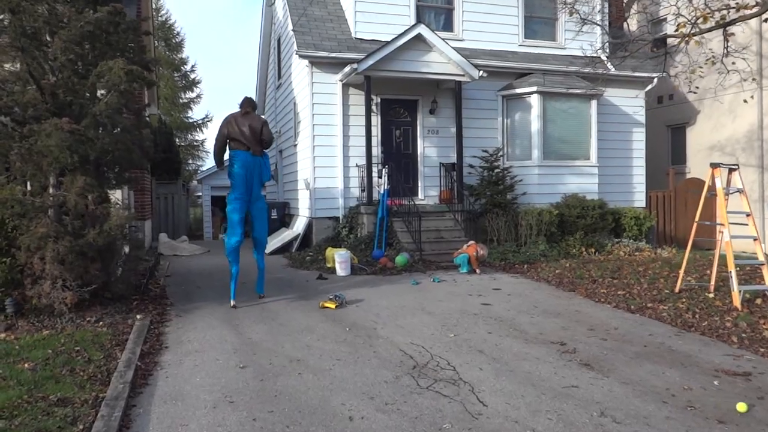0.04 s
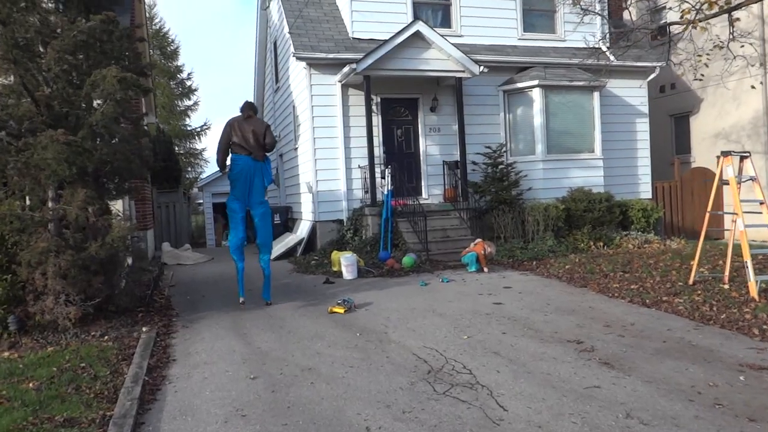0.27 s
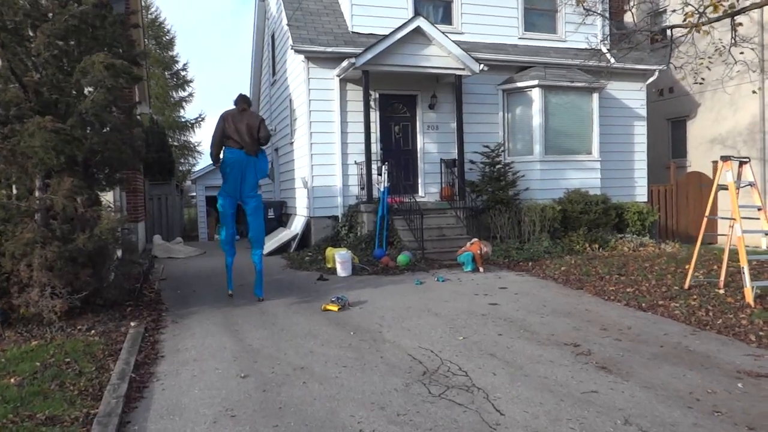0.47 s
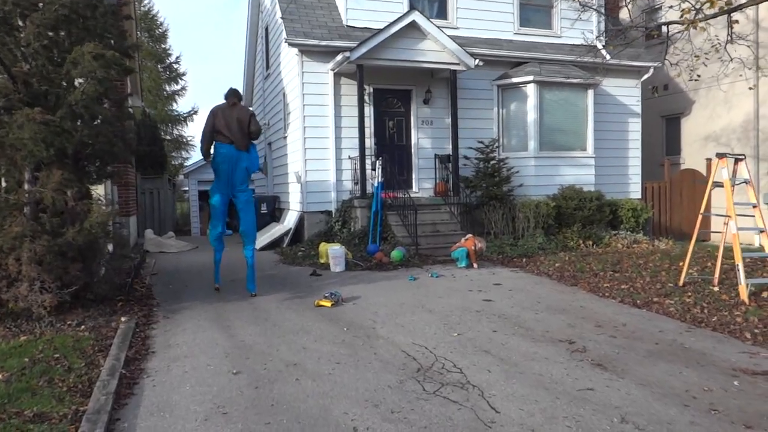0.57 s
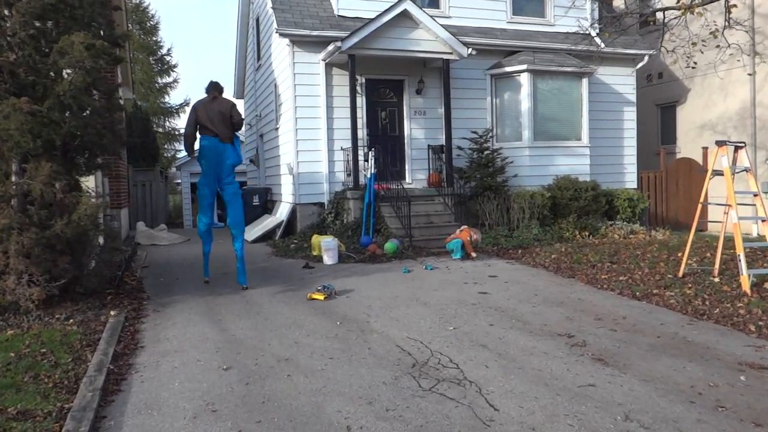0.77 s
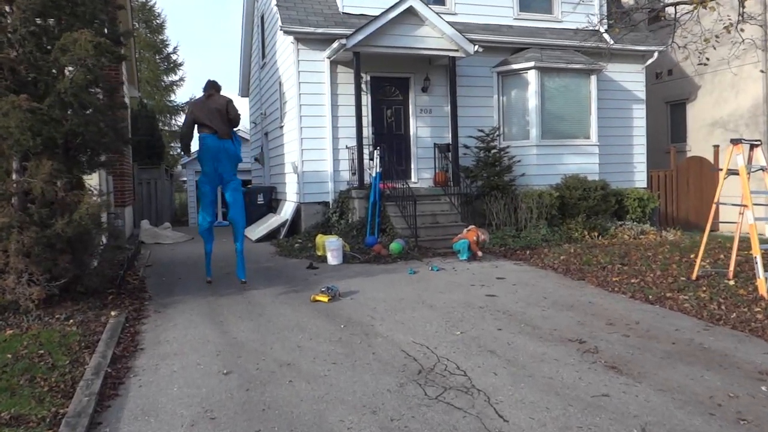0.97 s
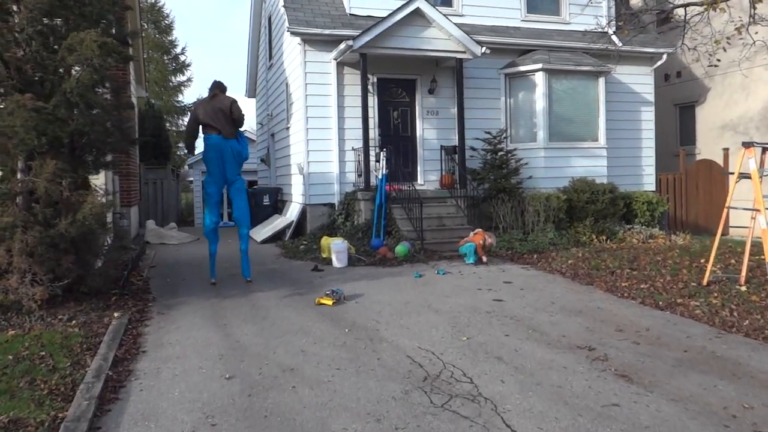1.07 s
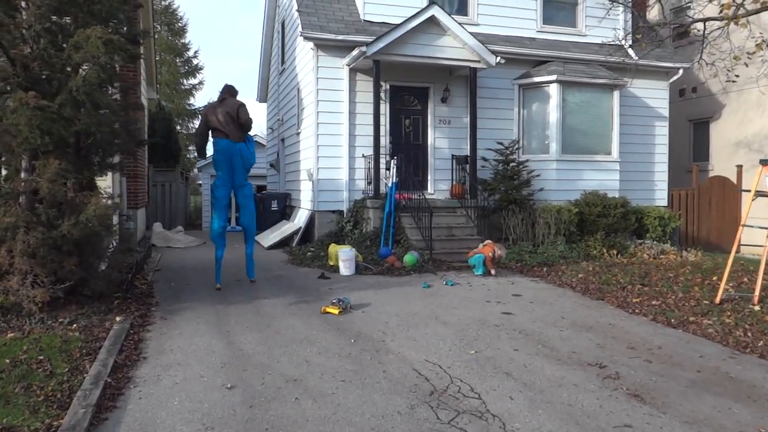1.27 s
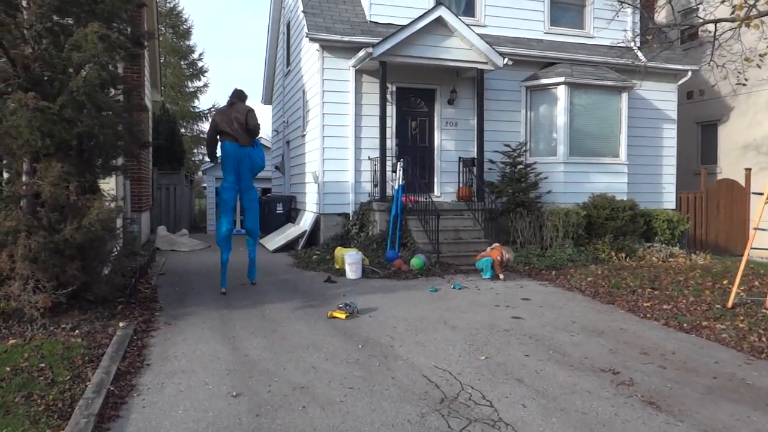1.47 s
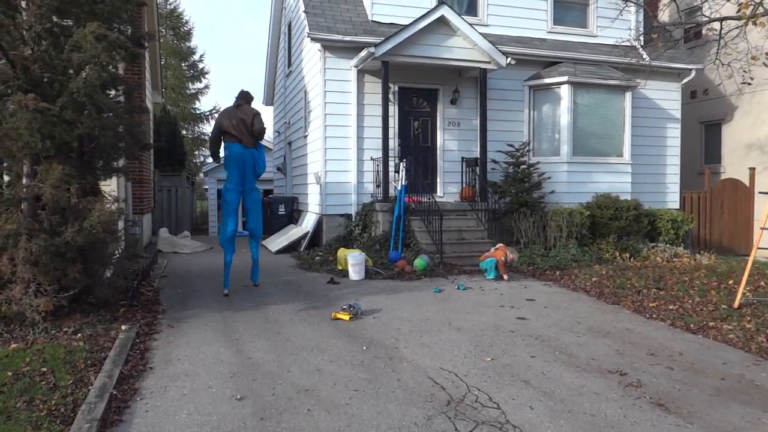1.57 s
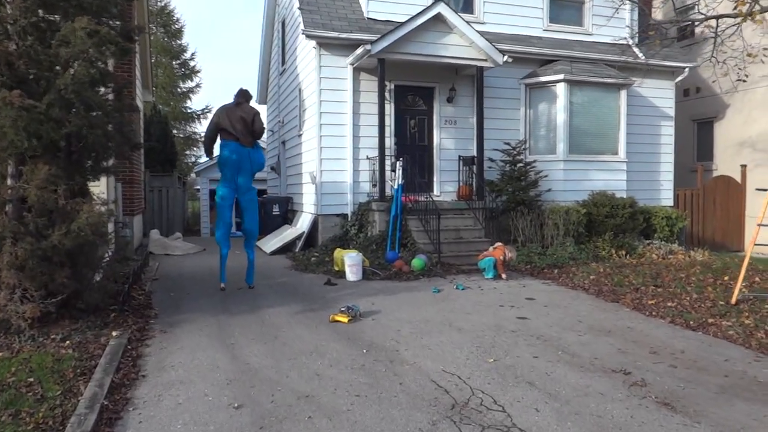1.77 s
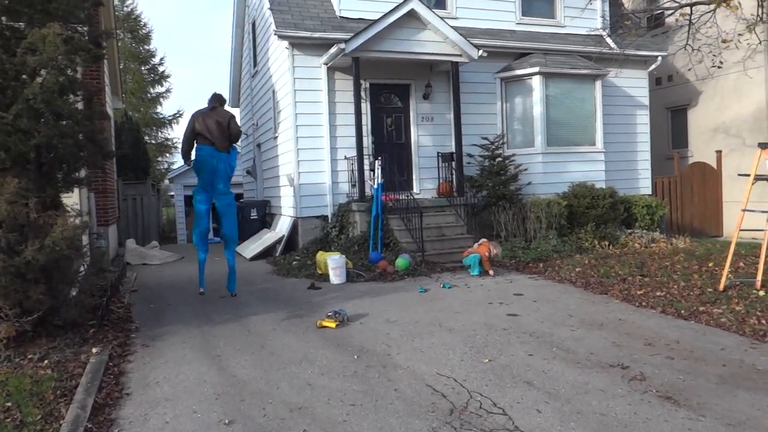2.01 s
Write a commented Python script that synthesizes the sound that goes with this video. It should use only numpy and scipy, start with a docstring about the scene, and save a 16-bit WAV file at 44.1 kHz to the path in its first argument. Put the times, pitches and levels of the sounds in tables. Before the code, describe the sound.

Stilts clop and scuff unevenly on a gritty asphalt driveway some metres away. Close to the microphone, the handheld camera snaps sharply at the start, then ticks and bumps softly over a faint wash of distant traffic.

```python
"""Stilts on an asphalt driveway

Someone walks on stilts some metres from a handheld camera, the tips clopping and scuffing over grit
to the right. Close to the microphone the camera body snaps, ticks and pings in the hand, and wind
and handling give low thumps. Distant traffic and air wash under it all."""
import sys
import numpy as np
from scipy import signal
from scipy.fft import rfft, irfft
from scipy.io import wavfile
from scipy.ndimage import uniform_filter1d

SR = 44100
rng = np.random.default_rng(int(sys.argv[2]) if len(sys.argv) > 2 else 0)


def generate_wav(sig):
    """Save sig (samples, or channels by samples) to the path in sys.argv[1] as 16-bit PCM at SR."""
    pcm = np.round(np.clip(np.atleast_2d(sig).T, -1, 1) * 32767).astype(np.int16)
    wavfile.write(sys.argv[1], SR, pcm)


N = 90184
BODY_PAN_DB, HISS_T60_S = 3.5, 0.013  # camera body noises; every pan is dB of left over right


def amp(db):
    return 10 ** (np.asarray(db, float) / 20)


def unit_rms(x):
    return x / np.sqrt(np.mean(x ** 2) + 1e-20)


def over_frequency(points, hz):
    f, value = np.transpose(points)
    return np.interp(np.log(hz + 1), np.log(f + 1), value)


def over_time(points):
    return np.interp(np.arange(N) / SR, *np.transpose(points))


def band(f, hz, octaves):
    return np.exp(-(np.log2((f + 1) / hz) / octaves) ** 2)


def place(mix, start_s, sound, pan_db):
    """Adds a sound at a time and between left and right."""
    at = round(start_s * SR)
    first = max(at, 0)
    sound = sound[max(-at, 0):][:N - first]
    mix[:, first:first + len(sound)] += amp([[pan_db / 2], [-pan_db / 2]]) * sound


def ring(modes, rise_s):
    """Dying sines with a soft start, peak 1."""
    t = np.arange(2600) / SR
    x = sum(amp(db - 60 * t / t60) * np.sin(2 * np.pi * min(hz, 15000) * t) for hz, db, t60 in modes)
    x *= 1 - np.exp(-t / rise_s)
    return x / abs(x).max()


def traffic_and_air():
    """A far wash of noise with drifting patches and a flickering treble."""
    # Colour of the wash. Each row: frequency in Hz, relative level in dB.
    spectrum = [(12, -48), (20, -6.5), (81, -4), (378, -3), (431, -4), (955, -1), (1500, -5.5),
                (1620, -9.5), (2000, -9), (3060, -14.5), (10100, -19), (11200, -27.5), (14600, -72),
                (22000, -120)]
    # Its slow fall. Each row: time in seconds, relative level in dB.
    levels = [(0.0, -44), (0.67, -45.5), (2.04, -46.5)]
    # Its stereo width. Each row: frequency in Hz, left-right correlation.
    likeness = [(60, 0.8), (170, 0.99), (500, 0.61), (1430, 0.65), (4110, 0.63), (11800, 0.56)]
    frames, hz = N // 128 + 5, np.fft.rfftfreq(512, 1 / SR)
    a, b, c, d, patches = rng.standard_normal((frames, 257, 5)).T
    patches_db = unit_rms(uniform_filter1d(uniform_filter1d(patches, size=8, axis=0), size=16, axis=1))
    flicker = unit_rms(uniform_filter1d(rng.standard_normal(frames), size=4))
    flicker_db = 1.57 * flicker * np.clip(hz / 5000, 0, 1)[:, None]
    same = over_frequency(likeness, hz)[:, None]
    left = a + 1j * b
    right = same * left + np.sqrt(1 - same ** 2) * (c + 1j * d)
    spectra = np.array([left * amp(-0.15), right * amp(0.15)]) * amp(patches_db + flicker_db)
    noise = signal.istft(spectra, nperseg=512, noverlap=384)[1][:, :N]
    wash = irfft(rfft(noise) * amp(over_frequency(spectrum, np.fft.rfftfreq(N, 1 / SR))), N)
    return unit_rms(wash) * amp(over_time(levels) + 1)


def wind_rumble(cutoff_hz=73, likeness=0.95):
    """Wind on the microphone: lumpy low noise, nearly alike at both ports."""
    # Gust strength. Each row: time in seconds, relative level in dB.
    gusts = [(0.0, -67), (0.04, -85), (1.95, -67.5), (2.04, -56.5)]
    hz = np.fft.rfftfreq(N, 1 / SR)
    left, other = rng.standard_normal((2, N))
    right = likeness * left + np.sqrt(1 - likeness ** 2) * other
    rumble = irfft(rfft([left, right]) * hz / (hz + 30) / (1 + (hz / cutoff_hz) ** 4), N)
    return unit_rms(rumble) * amp(over_time(gusts) + 8)


def stilt_scuffs(grains_per_s=9000, top_hz=11150):
    """A tip drags over grit: dense grains that swell and fade."""
    # Drags. Each row: start, rise and time to fade 30 dB in seconds, rms level at the crest in dB,
    # centre in Hz, half-width in octaves, pan in dB.
    drags = [(-.03, 0.037, 0.1, -32.5, 7300, 0.56, -8), (-.01, 0.019, 0.12, -36.5, 3020, 1.6, -4.5),
             (0.031, 0.0055, 0.19, -37.5, 6100, 2.9, -9), (0.061, 0.037, 0.085, -41.5, 1560, 1.2, -1),
             (0.152, 0.033, 0.14, -45.5, 5750, 2.1, -8.5), (.34, 0.059, 0.95, -47, 1580, 0.86, -1),
             (.47, 0.03, 0.076, -48, 6960, 0.86, -6.5), (0.688, 0.017, 0.14, -49.5, 6700, 0.9, -4),
             (0.749, 0.032, 0.041, -44.5, 6140, 4.4, -7.5), (.955, 0.0023, 0.17, -41.5, 5670, 3.6, -6.5),
             (1.057, 0.034, 0.1, -53.5, 5500, 2, -14), (1.226, 0.12, 0.17, -54.5, 9600, 0.7, -1.1),
             (1.297, 0.016, 0.014, -40, 2480, 3.5, -8), (1.311, 0.0088, 0.031, -31, 1460, 0.95, -3.5),
             (1.327, 0.0079, 0.051, -36, 1650, 1.48, -4), (1.35, 0.0067, 0.056, -36, 905, 2.9, -7),
             (1.341, 0.049, 0.13, -43.5, 4730, 1.5, -4), (1.978, 0.0016, 0.038, -39, 9150, 0.82, 1),
             (1.984, 0.0028, 0.017, -35.5, 9800, 0.28, -2), (2.01, 0.0024, 0.067, -44.5, 8000, 2.5, -2)]
    mix = np.zeros((2, N))
    t, f = np.arange(16384) / SR, np.fft.rfftfreq(16384, 1 / SR)
    for start, rise, fade, db, hz, octaves, pan_db in drags:
        hit, size, sign = rng.random((3, len(t)))
        grain_db = -2.2 * np.log(size + 0.0023)  # many faint grains, a few loud ones
        grains = (hit < grains_per_s / SR) * amp(grain_db) * np.sign(sign - 0.5)
        grit = unit_rms(irfft(rfft(grains) * band(f, hz, octaves) * np.exp(-(f / top_hz) ** 40)))
        envelope = np.minimum(t / rise, 1) ** 2 * amp(db - 30 * np.maximum(t - rise, 0) / fade)
        place(mix, start, grit * envelope, pan_db)
    return mix


def microphone_thumps(dc_removal=0.87):
    """Wind and handling give short low thumps, reaching one port a little before the other."""
    # Thumps. Each row: centre in seconds, gain in dB, pitch in Hz, half-length in cycles, pan in dB.
    thumps = [(.0208, -30, 293, 0.91, -1.5), (0.054, -38, 294, 0.88, -1), (0.357, -33.5, 81, 0.26, 0),
              (0.5047, -29.5, 317, 0.96, -.5), (0.3418, -41.5, 370, 2.2, 1),
              (0.7485, -33.5, 215, 0.72, 1.5), (0.797, -32.5, 91, 0.27, -2.4), (.936, -24, 358, 0.77, -2),
              (0.9558, -33.5, 136, 0.61, -1), (1.001, -35, 267, 0.56, 10), (1.0069, -28, 196, 0.59, -5),
              (1.065, -37.5, 89, 0.42, 0), (1.09, -33.5, 137, 0.5, 0), (1.103, -30.5, 74, 0.35, 0.5),
              (1.3238, -32, 395, 1.8, -1), (1.333, -32.5, 430, 0.8, -3), (1.3595, -29, 427, 0.62, -1),
              (1.3729, -33, 325, 0.34, 3), (1.384, -43.5, 64.6, 0.65, -2), (1.421, -42.5, 68.6, 0.98, -2),
              (1.435, -41.5, 134, 0.92, 1), (1.5848, -29.5, 166, 0.66, 0),
              (1.5932, -31.5, 145, 0.26, -15.5), (1.6076, -31, 167, 0.51, 8),
              (1.6692, -25.5, 226, 0.4, 5.5), (1.689, -22.5, 141, 0.35, 5.5), (1.8995, -32, 192, 0.43, 5),
              (1.926, -38, 82.5, .6, .5), (1.941, -39, 230, 1, -7), (1.951, -36, 202, 0.51, 9)]
    mix, t = np.zeros((2, N)), np.arange(-900, 900) / SR
    for centre, db, hz, cycles, pan_db in thumps:
        skew_cycles = 0.084 * rng.uniform(-1.76, 1)
        at = round(centre * SR) - 900
        for port, side in enumerate((1, -1)):
            phase = t * hz + side * skew_cycles
            bump = np.exp(-(phase / cycles) ** 2)
            pulse = -np.sin(2 * np.pi * phase + 0.82) * bump
            pulse -= dc_removal * bump * pulse.sum() / bump.sum()  # takes out most of the DC offset
            mix[port, at:at + len(t)] += amp(db + side * pan_db / 2) * pulse[:N - at]
    return mix


def camera_snaps(main_hz=5200, rise_s=0.0007):
    """A snap swells for a moment, peaks sharply and leaves the plastic body ringing."""
    # Snaps. Each row: time of the peak in seconds, level in dB,
    # lift of the modes in dB per octave away from main_hz.
    snaps = [(0.0758, -9.5, 3), (0.086, -8, 2), (0.0941, -17, -1), (0.104, -30, -12)]
    # Modes of the body. Each row: frequency in Hz, relative level in dB, T60 in seconds.
    body_modes = [(2600, -15, .003), (3600, -16, .010), (4400, -7, .011), (4750, -10, .008),
                  (5170, -6, .011), (6020, -11, .012), (6650, -12, .008), (7600, -13, .005),
                  (8780, -1, .0065), (9900, -10, .005), (10650, -9, .004)]
    mix, t = np.zeros((2, N)), np.arange(-300, 2300) / SR
    swell, after = np.exp(np.minimum(t, 0) / rise_s), np.maximum(t, 0)
    low_mode = amp(-24.5) * ring([(1473, 0, 0.023)], rise_s=0.00053)
    for peak_s, db, lift_db in snaps:
        body = sum(amp(mode_db + lift_db * abs(np.log2(hz / main_hz)) - 60 * after / t60)
                   * np.sin(2 * np.pi * hz * t) for hz, mode_db, t60 in body_modes)
        hiss = amp(-20 - 60 * after / HISS_T60_S) * np.diff(rng.standard_normal(len(t)), prepend=0)
        place(mix, peak_s + t[0], amp(db) * swell * (body / abs(body).max() + hiss), BODY_PAN_DB)
        place(mix, peak_s, amp(db) * low_mode, BODY_PAN_DB / 2)
    return mix


def camera_ticks(rise_s=0.0007):
    """The body ticks in the hand: small dry bursts of hiss."""
    # Ticks. Each row: start in seconds, relative level in dB, pitch in Hz, pan in dB.
    ticks = [(0.1882, -38.5, 6850, -11), (0.4926, -39.5, 7900, -14), (0.625, -36.5, 9170, 0),
             (0.6335, -40.5, 7800, -14), (0.646, -36, 3940, -4.0), (0.767, -32, 6100, 2),
             (0.7776, -33, 5000, 6), (.7853, -31, 5030, 1), (0.7934, -39.5, 8000, 0),
             (0.882, -34.5, 9700, -2), (0.9857, -47, 3190, -7), (1.077, -35, 4940, -8),
             (1.2464, -36, 9300, -1.0), (1.263, -35.5, 8250, -3), (1.2706, -35, 8850, 4),
             (1.285, -35, 7400, 2), (1.4043, -44, 6400, 12.5), (1.9575, -44, 9200, -13)]
    mix = np.zeros((2, N))
    t, f = np.arange(2600) / SR, np.fft.rfftfreq(2600, 1 / SR)
    for start, db, hz, pan_db in ticks:
        colour = (0.2 + band(f, hz, octaves=0.3)) * f / (f + 2000)
        hiss = unit_rms(irfft(rfft(rng.standard_normal(len(t))) * colour))
        envelope = np.minimum(t / rise_s, 1) * amp(db - 0.5 - 60 * t / HISS_T60_S)
        place(mix, start, hiss * envelope, pan_db)
    return mix


def stilt_clops(crunch_db=-29, crunch_t60_s=0.013):
    """A landing tip rings briefly, and the grit crushed under it shakes it again."""
    # Landings. Each row: start in seconds, peak in dB, pitch in Hz, T60 in seconds,
    # gain of the upper modes in dB, pan in dB.
    landings = [(0.2571, -26, 1040, 0.022, -6.5, 0), (0.3414, -21.5, 940, 0.0084, 4, 0),
                (0.7693, -24, 1430, 0.0036, -3, 0), (1.114, -35, 2320, 0.0098, -2, -5),
                (1.3189, -31, 2090, 0.0043, -1, -8), (1.3209, -23.5, 1600, 0.012, 3, -8),
                (1.329, -23, 3780, 0.0096, -8, -6.5), (1.3328, -38, 1980, 0.0017, 0, -2),
                (1.3358, -28.5, 1720, 0.018, -17, -11), (1.342, -29.5, 1270, 0.017, -20, -2.2),
                (1.3565, -29.5, 860, 0.0053, -11, 1)]
    # Upper modes of a tip. Each row: multiple of the pitch, relative level in dB.
    tip_modes = [(1.55, 2.5), (2.3, 1.5), (3.5, -7)]
    mix, t = np.zeros((2, N)), np.arange(600) / SR
    for start, db, hz, t60, upper_db, pan_db in landings:
        crunch = rng.standard_normal(len(t)) * amp(crunch_db - 60 * t / crunch_t60_s)
        upper = [(k * hz, mode_db + upper_db, t60 / k ** 2) for k, mode_db in tip_modes]
        tip = ring([(hz, 0, t60)] + upper, rise_s=0.00017)
        clop = np.convolve(tip, np.r_[1, crunch])
        place(mix, start, amp(db) * clop / abs(clop).max(), pan_db)
    return mix


def camera_ping(start_s=0.9549, rise_s=0.0002, hold_s=0.0024, t60_s=0.0069, sag_db_per_s=2000):
    """One slower snap pings a small hard part: held for a moment, then damped."""
    # Modes of the part. Each row: frequency in Hz, relative level in dB.
    part_modes = [(1540, -13), (3600, -27), (4500, -17), (5200, 0), (6780, -12), (8900, -8), (10100, -7)]
    mix, t = np.zeros((2, N)), np.arange(1200) / SR
    tone = sum(amp(db) * np.sin(2 * np.pi * (hz * t + rng.random())) for hz, db in part_modes)
    hiss = amp(0.5) * unit_rms(np.diff(rng.standard_normal(len(t) + 1)))
    attack = (1 - np.exp(-t / rise_s)) ** 2
    fall_db = sag_db_per_s * t + 60 * np.maximum(t - hold_s, 0) / t60_s
    place(mix, start_s, (tone + hiss) * attack * amp(-18.5 - fall_db), BODY_PAN_DB)
    return mix


def yard_scatter(direct, level_db=-18, t60_s=0.39):
    """A short faint scatter from the house front and the ground."""
    t = np.arange(6000) / SR
    tail = rng.standard_normal((2, len(t))) * amp(-60 * t / t60_s) * (t > 0.003)
    return amp(level_db) * signal.fftconvolve(direct, tail / np.linalg.norm(tail[0]), axes=1)[:, :N]


def scene():
    """Stilts and camera sound into the yard; thumps, wind and the far wash join them at the microphone."""
    direct = stilt_clops() + stilt_scuffs() + camera_snaps() + camera_ticks() + camera_ping()
    return direct + yard_scatter(direct) + microphone_thumps() + wind_rumble() + traffic_and_air()


def record(dry):
    """The camera microphone falls away steeply in the top treble; a low-pass cuts off the rest."""
    hz, top_hz = np.fft.rfftfreq(2 * N, 1 / SR), 13200
    response_db = np.interp(hz, [11100, 11350, top_hz], [0, -22, -46])
    dulled = irfft(rfft(dry, 2 * N) * amp(response_db))[:, :N]
    low_pass = signal.firwin(511, top_hz, window=("kaiser", 9), fs=SR)
    return signal.oaconvolve(dulled, low_pass[None], "same")


dry = scene()
out = record(dry)
generate_wav(out)
```